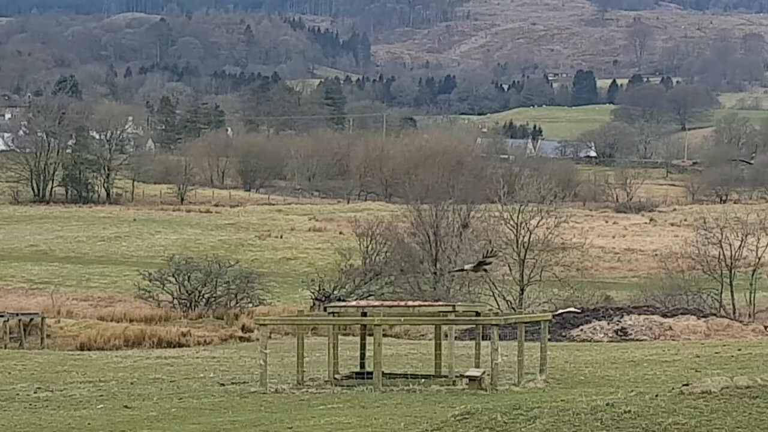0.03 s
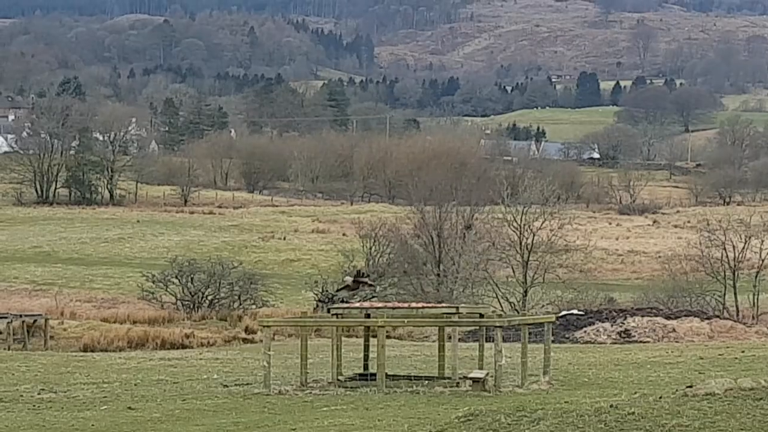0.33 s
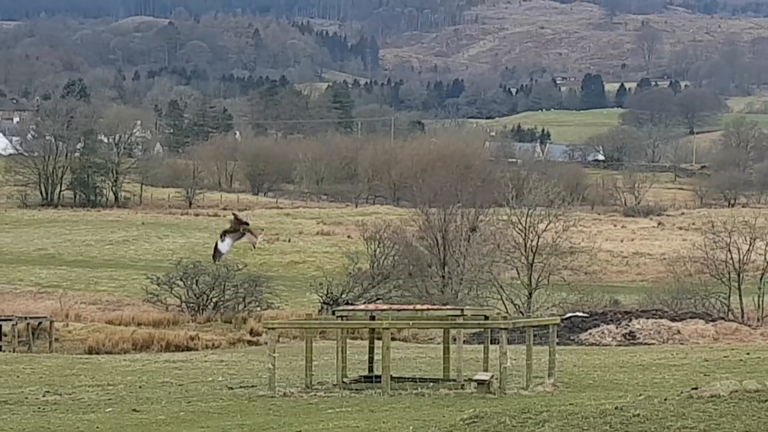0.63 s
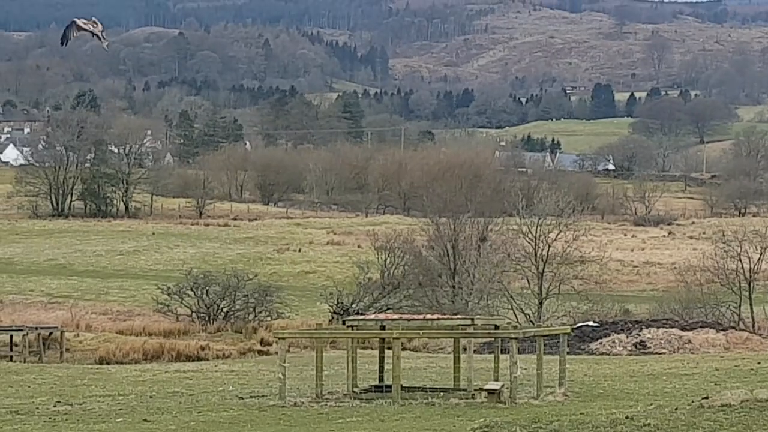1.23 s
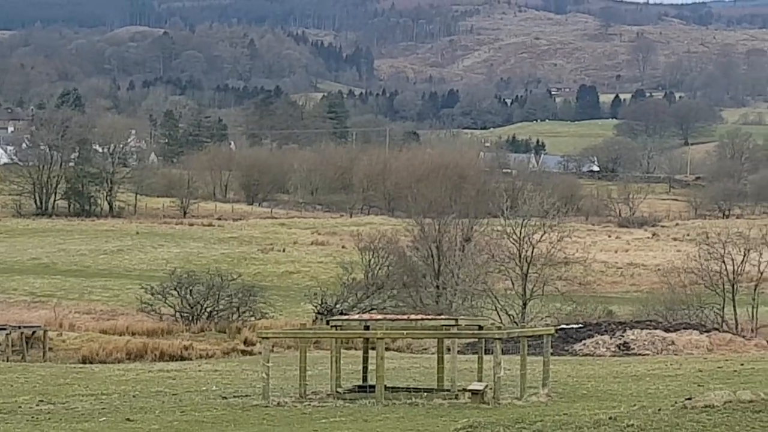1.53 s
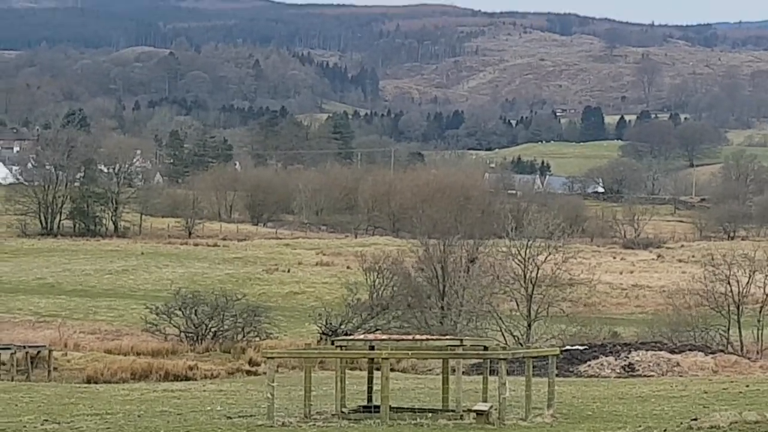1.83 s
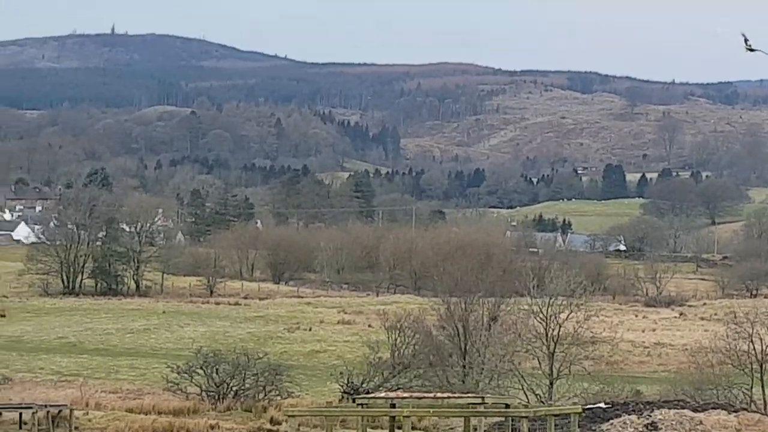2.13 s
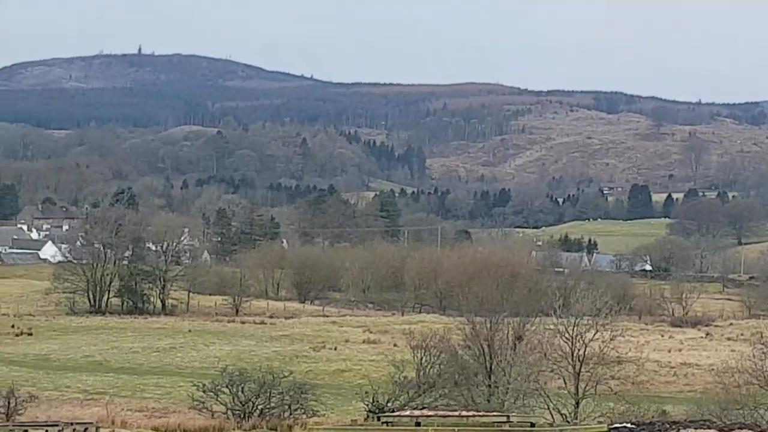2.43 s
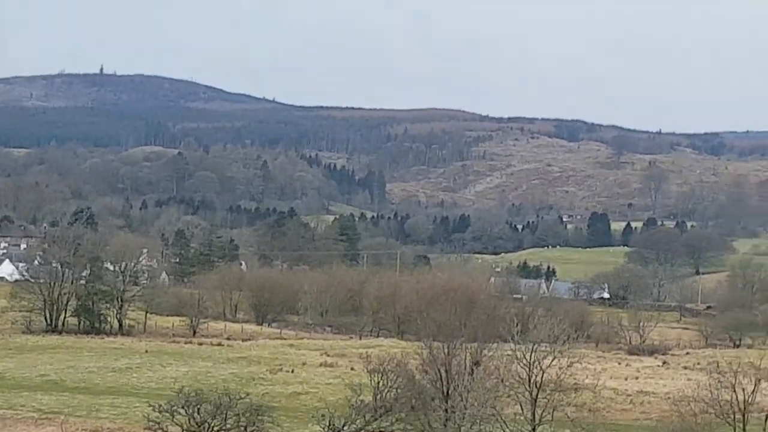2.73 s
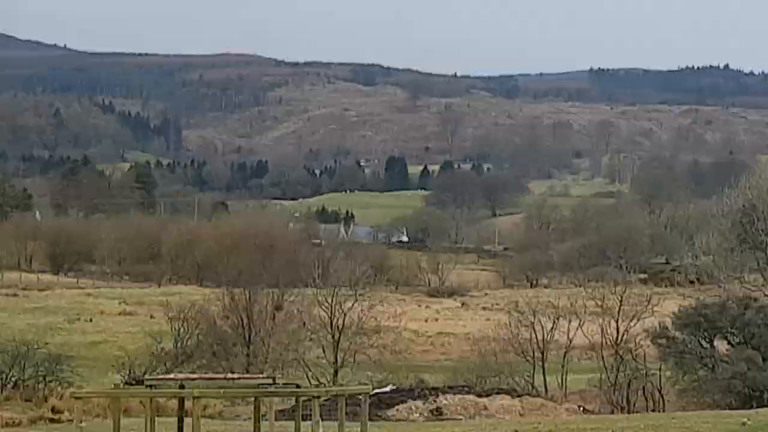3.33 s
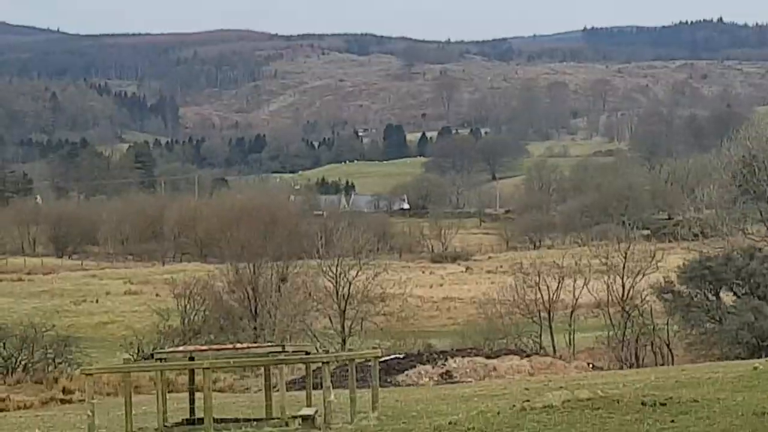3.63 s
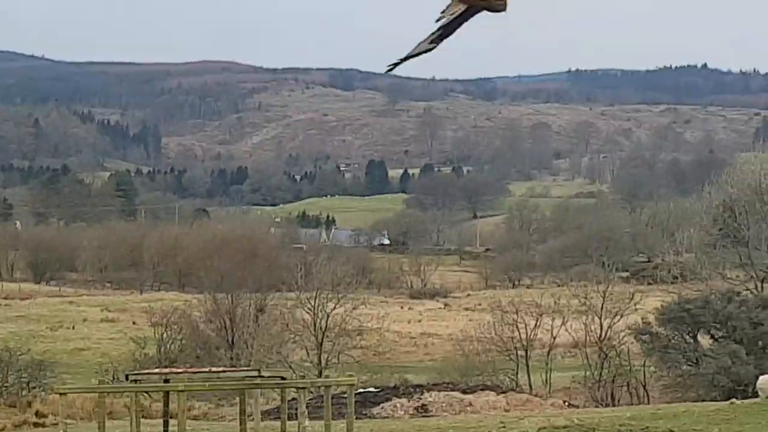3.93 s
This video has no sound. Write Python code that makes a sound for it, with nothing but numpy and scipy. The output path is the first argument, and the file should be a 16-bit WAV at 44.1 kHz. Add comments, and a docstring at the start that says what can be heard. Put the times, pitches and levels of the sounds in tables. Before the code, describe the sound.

Wind rumbles and thumps on the microphone, with thin, wavering bird whistles behind it.

```python
"""Gusts buffet the two microphone ports of a hand-held camera while red kites whistle over an open field.
Eddies strike each port as random low thumps; the kites sing thin, wavering tones, hoarser farther off.
The camera ticks three times, and there is one sharp crack as a gust overloads the right microphone.
As the camera swings round, a hand or sleeve brushes its left side with a grainy hiss.
Far off, an animal, probably a cow, gives one faint call."""
import sys
import numpy as np
from scipy import signal
from scipy.fft import rfft, irfft
from scipy.io import wavfile

SR = 44100
rng = np.random.default_rng(int(sys.argv[2]) if len(sys.argv) > 2 else 0)


def file_out(sig):
    """Save sig as 16-bit WAV at sys.argv[1]."""
    # one column per channel
    cols = np.atleast_2d(sig).T
    # limit, then scale
    lim = np.clip(cols, -1, 1)
    pcm = np.round(lim * 32767).astype(np.int16)
    wavfile.write(sys.argv[1], SR, pcm)


N = 176400
T = np.arange(N) / SR
HZ = np.fft.rfftfreq(N, 1 / SR)


def amp(db):
    """Decibels to gain."""
    return 10 ** (np.asarray(db) / 20)


def unit(x):
    """Scales to rms 1."""
    return x / np.sqrt(np.mean(x ** 2) + 1e-20)


def colour(x, points):
    """Equalises by a curve of (frequency [Hz], gain [dB]) points."""
    hz, db = np.transpose(points)
    return irfft(rfft(x) * amp(np.interp(np.log(HZ + 1), np.log(hz), db)), N)


def noise(points):
    """Noise of rms 1 with the given spectrum."""
    return unit(colour(rng.standard_normal(N), points))


def drift(hz):
    """Smooth random modulation of rms 1, moving at up to about hz."""
    return unit(irfft(rfft(rng.standard_normal(N)) * np.exp(-(HZ / hz) ** 2), N))


def phase_of(hz):
    """Running phase of a pitch curve."""
    return 2 * np.pi * np.cumsum(hz) / SR


def field_echo(x, t60_s=0.38):
    """Scatter from the ground and trees, different at each port."""
    t = T[:SR // 2]
    tails = [rng.standard_normal(len(t)) * amp(-60 * t / t60_s) for _ in range(2)]
    return np.array([signal.fftconvolve(x, tail / np.linalg.norm(tail))[:N] for tail in tails])


def field_air():
    """The open field: a soft, slightly wavering bed of noise."""
    # spectrum of the bed (frequency [Hz], level [dB])
    spectrum = [(100, 4), (400, 12.5), (750, 2), (1050, 2), (1400, -4), (2200, -2.5), (3200, -9.5),
                (5000, -12.5), (6200, -18.5), (7700, -16.5), (9000, -27), (10500, -26), (12300, -20.5),
                (15800, -24)]
    # bed level (left [dB], right [dB])
    sides_db = [-55, -50.5]
    return np.array([amp(db + 1.2 * drift(16)) * noise(spectrum) for db in sides_db])


def port_wind(curve, buffets):
    """Eddies strike one port in clumps of random pushes, with one hard blow in each buffet."""
    # eddy sound in a wind of ref_db (band centre [Hz], level [dB], growth [dB per dB of wind])
    eddy_bands = [(28.7, -38.5, 0.23), (64, -27, 0.53), (126, -20.5, 0.72), (266.5, -24, 1.05),
                  (496.5, -36.5, 1.72), (971, -63, 3), (1980, -79.5, 2)]
    ref_db, eddies_per_s, spread_db, clump_db = -20, 700, 5.5, 4
    buffet_s, blow_db, sharpest_db, port_hz = 0.016, 7, 24, 85
    level = np.interp(T, *np.transpose(curve))
    clumps = clump_db * drift(30) / np.hypot(1, amp(level - ref_db) ** 2)  # strong wind is steadier
    power = amp(level + clumps) ** 2
    strikes = rng.random(N) < eddies_per_s / SR
    size = amp(spread_db * rng.uniform(-1, 1, N))
    for s, db in buffets:
        power += amp(db) ** 2 * np.exp(-(2 * (T - s) / buffet_s) ** 2)
        strikes[round(s * SR)], size[round(s * SR)] = True, amp(blow_db)
    pushes = strikes * rng.choice([-1, 1], N)
    strength = size * np.sqrt(power) / amp(ref_db)
    sharpness = strength / np.hypot(1, strength / amp(sharpest_db))  # harder is brighter, up to a limit
    jw = 1j * HZ / port_hz
    low_cut = jw ** 2 / (1 + jw + jw ** 2)  # the port cuts the deepest bass
    centres = [row[0] for row in eddy_bands]
    knots = np.log([centres[0] / 2] + centres + [centres[-1] * 2])
    spectrum = 0
    for k, (_, db, growth) in enumerate(eddy_bands):
        band = low_cut * np.interp(np.log(HZ + 1), knots, np.arange(len(knots)) == k + 1)
        band /= np.sqrt(np.mean(abs(band) ** 2))
        train = pushes * strength * sharpness ** (growth - 1) / np.std(pushes * size ** growth)
        spectrum += amp(db) * band * rfft(train)
    return irfft(spectrum, N)


def gusts():
    """Wind rumbles and thumps on each port separately, harder on the right."""
    # wind strength at each port (time [s], level [dB])
    wind_left = [(0, -42), (.28, -46.5), (.5, -39.5), (.66, -24.5), (.88, -30), (1.1, -40), (1.2, -57),
                 (1.34, -25), (1.5, -34), (1.72, -37.5), (1.95, -28), (2.2, -28.5), (2.36, -32),
                 (2.72, -32.5), (2.88, -19), (3.0, -29.5), (3.12, -15.5), (3.3, -29.5), (3.5, -39.5),
                 (3.66, -33.5), (3.78, -48.5), (4, -46)]
    wind_right = [(0, -53.5), (.07, -56), (.3, -34), (.38, -43), (.48, -30), (.62, -33.5), (.92, -38),
                  (.98, -16), (1.15, -19.5), (1.24, -43.5), (1.57, -37.5), (1.63, -14), (1.9, -14),
                  (2.18, -15.5), (2.25, -24), (2.4, -38.5), (2.76, -47.5), (3.0, -30.5), (3.1, -22.5),
                  (3.48, -22.5), (3.56, -37.5), (3.65, -13.5), (3.8, -28.5), (4, -34.5)]
    # short buffets at each port (peak time [s], level [dB])
    buffets_left = [(.098, -31), (.513, -25.5), (0.643, -23), (0.677, -17), (0.691, -22.5), (0.734, -13),
                    (.852, -18.5), (.912, -26), (1.024, -20), (1.089, -19), (1.308, -22.5), (1.378, -23),
                    (1.552, -17.5), (1.633, -22.5), (1.978, -11.5), (2.086, -17.5), (2.164, -16),
                    (2.61, -15.5), (2.637, -22), (2.772, -19), (3.132, -20.5), (3.207, -14.5), (3.343, -21)]
    buffets_right = [(.135, -24), (.156, -19.5), (.439, -24.5), (.556, -17), (.677, -16.5), (.695, -20),
                     (.817, -12.5), (0.98, -16), (1.128, -28), (1.616, -12.5), (1.654, -19.5), (1.778, -17),
                     (1.84, -9), (1.883, -10), (1.926, -13), (1.962, -10.5), (2.013, -11), (2.048, -10),
                     (2.079, -15), (2.135, -14), (2.173, -13), (2.194, -10), (2.329, -21), (2.461, -20),
                     (3.106, -17), (3.195, -27.5), (3.481, -19.5), (3.634, -15.5)]
    return np.array([port_wind(wind_left, buffets_left), port_wind(wind_right, buffets_right)])


def kite_whistle(contour):
    """A thin, unsteady tone with two flickering overtones; the upper one drops out on high notes."""
    waver, waver_hz, flutter_db = .004, 130, 2.8
    third_db, third_top_hz = -15, 6900
    s, hz, fundamental_db, octave_db = np.transpose(contour)
    pitch = np.interp(T, s, hz) * (1 + waver * drift(waver_hz))
    phase = phase_of(pitch)
    gate = np.clip((T - s[0]) / 0.0076, 0, 1) * np.clip((s[-1] - T) / .01, 0, 1)
    fundamental = amp(np.interp(T, s, fundamental_db)) * np.sin(phase)
    third_gain = amp(third_db) / np.hypot(1, (3 * pitch / third_top_hz) ** 30)
    overtones = np.sin(2 * phase) + third_gain * np.sin(3 * phase)
    overtones *= amp(np.interp(T, s, octave_db) + 0.5 * drift(25))
    return np.sqrt(2) * gate * (fundamental + overtones) * amp(flutter_db * drift(waver_hz))


def far_kite(start, length, top_hz, db, hiss_db, roughness, bend):
    """A hoarse, broken whistle that arches up and down, with some hiss."""
    # rasp in the voice (frequency [Hz], level [dB])
    rasp = [(2000, -39.5), (3500, -3), (7300, -10), (9000, -24.5)]
    arch = np.sin(np.pi * np.clip((T - start) / length, 0, 1))
    pitch = top_hz * (1 - bend * (1 - arch) ** 2) * (1 + roughness * drift(500))
    envelope = amp(db + 3 * drift(60)) * arch ** 0.61
    return envelope * (np.sin(phase_of(pitch)) + amp(hiss_db) * noise(rasp))


def red_kites(echo_db=-15, pan_db=4.5):
    """A long whistle, a higher one and hoarse far notes echo over the field, off to the right."""
    # whistle contours (time [s], pitch [Hz], fundamental [dB], octave [dB])
    long_whistle = [(0, 2017, -73, -67), (.055, 2000, -69, -73), (.118, 2050, -61, -79.5),
                    (.234, 2055, -68.5, -74), (.3, 2040, -72, -82), (.48, 2150, -74.5, -78),
                    (.57, 2170, -76, -75), (.61, 2243, -76, -67.5), (.665, 2257, -67, -66.5),
                    (.74, 2216, -76.5, -72.5), (.815, 2280, -63, -69), (.85, 2250, -68, -65),
                    (.89, 2200, -80.5, -68.5), (.988, 2360, -61, -68.5), (1.04, 2370, -57.5, -73.5),
                    (1.065, 2354, -59.5, -64), (1.11, 2140, -66, -79)]
    high_whistle = [(1.452, 2310, -75, -90), (1.47, 2500, -50.5, -83), (1.479, 2956, -49, -72),
                    (1.494, 2970, -44.5, -73), (1.522, 2890, -48.5, -75.5), (1.556, 2840, -46.5, -73),
                    (1.588, 2778, -47, -73), (1.618, 2560, -66, -85.5), (1.636, 2400, -51.5, -66),
                    (1.66, 2274, -57, -77), (1.71, 2235, -56.5, -91.5), (1.765, 2180, -77, -83.5),
                    (1.8, 2185, -80, -89), (1.83, 2260, -56.5, -77), (1.875, 2380, -57, -82.5),
                    (1.925, 2220, -71, -87.5)]
    # kites farther off (start [s], length [s], top pitch [Hz], level [dB], hiss share [dB],
    # pitch roughness [0-1], pitch bend [0-1])
    far_notes = [(0.83, .07, 5050, -73, -3, .025, .05), (1.128, 0.15, 3830, -61, -8, .06, .04),
                 (2.17, 0.14, 2880, -60.5, -18, .04, .25), (2.455, 0.12, 2830, -63.5, -16, .045, .25)]
    calls = kite_whistle(long_whistle) * amp(2.2 * drift(30))  # the long call flickers more
    calls += kite_whistle(high_whistle)
    calls += sum(far_kite(*note) for note in far_notes)
    return (calls + amp(echo_db) * field_echo(calls)) * amp([[-pan_db], [pan_db]])


def ticks_and_crack():
    """Three camera ticks and an overload crack on the right: snaps with a gritty tail and a short ring."""
    # snaps (time [s], level [dB], treble roll-off [Hz], ring share [dB])
    # the second row is the crack of a gust overloading the right microphone
    snaps = [(1.7014, -29.5, 3600, -6.5), (1.8832, -18, 7000, -22), (2.0954, -11.5, 20000, -28),
             (2.3855, -20, 4500, -28)]
    # tone of a snap (frequency [Hz], gain [dB])
    snap_eq = [(500, -13), (2500, 8), (4200, 2.5), (6000, -11), (7500, -2), (9700, -21.5), (12000, -12.5),
               (15000, -6)]
    ring_hz, ring_s, tail_s, tail_db, left_db = 3170, 0.0023, 0.012, -28.5, -22
    out = np.zeros(N)
    for s, db, top_hz, ring_db in snaps:
        age, gain = np.maximum(T - s, 0), amp(db) * (T >= s)
        snap = gain * amp(tail_db) * np.exp(-age / tail_s) * rng.standard_normal(N)
        snap[round(s * SR)] = amp(db)  # the transient
        out += irfft(rfft(colour(snap, snap_eq)) / np.hypot(1, (HZ / top_hz) ** 2), N)
        out += gain * amp(ring_db) * np.exp(-age / ring_s) * np.sin(2 * np.pi * ring_hz * age)
    return out * amp([[left_db], [0]])


def brushes(grain_db=1.5, right_db=-27):
    """Cloth or skin sweeps past the left port: a grainy hiss with a lower scrape."""
    # strokes (peak time [s], rise [s], fall [s], level [dB], scrape share [dB])
    strokes = [(2.79, 0.071, 0.039, -48, -28), (3.005, 0.033, 0.038, -43.5, -24),
               (3.158, 0.021, 0.019, -23, -3), (3.535, 0.052, 0.042, -37.5, -34),
               (3.639, 0.016, 0.026, -31.5, 8.5)]
    # spectra of the hiss and the scrape (frequency [Hz], level [dB])
    hiss_eq = [(800, -15), (3000, 0), (5000, -2.5), (7700, 1.5), (9300, -2), (10700, 1.5), (12000, 7),
               (13500, -3), (15800, -1.5)]
    scrape_eq = [(150, -11), (400, -4), (800, 2.5), (1500, -1.5), (3000, -6), (5000, -12), (9000, -20),
                 (16000, -40)]
    hiss_gain, scrape_gain = np.zeros(N), np.zeros(N)
    for s, rise, fall, db, scrape_db in strokes:
        stroke = amp(db) * np.exp(-abs((T - s) / np.where(T < s, rise, fall)) ** 1.08)
        stroke *= np.clip((s + 2.64 * fall - T) / .008, 0, 1)  # lift-off cuts the tail
        hiss_gain += stroke
        scrape_gain += stroke * amp(scrape_db)
    grain = unit(amp(grain_db * drift(500)))
    friction = np.array([hiss_gain * noise(hiss_eq) + scrape_gain * noise(scrape_eq) for _ in range(2)])
    return grain * friction * amp([[0], [right_db]])


def rubbing():
    """A steady friction hiss at both ports while the camera turns."""
    # rub envelope (time [s], level [dB])
    envelope = [(2.745, -46.5), (2.92, -45), (3.06, -45), (3.24, -49), (3.36, -46), (3.47, -47),
                (3.6, -39.5), (3.69, -41.5), (3.78, -45), (3.88, -44.5), (4, -46)]
    # rub spectrum at each port (frequency [Hz], level [dB])
    left_eq = [(200, 6), (600, 2), (1300, -3.5), (2500, -6.5), (4200, -16), (7500, -15), (9500, -18),
               (12200, -13.5), (13500, -17), (15800, -26)]
    right_eq = [(200, 0.5), (600, -2), (1300, -4), (2500, -8), (4200, -14.5), (6000, -16), (7700, -14),
                (9200, -30), (12200, -26), (15800, -23)]
    # balance (left [dB], right [dB])
    sides_db = [-2, 0.5]
    hiss = np.array([noise(left_eq), noise(right_eq)]) * amp(sides_db)[:, None]
    return hiss * amp(np.interp(T, *np.transpose(envelope)) + 0.55 * drift(120))


def handling(start_s=2.735):
    """A hand or sleeve meets the camera, bringing in the brushes and the rub together."""
    contact = np.clip((T - start_s) / 0.0062, 0, 1)
    return contact * (brushes() + rubbing())


def distant_lowing(echo_db=-9, left_db=-3):
    """A far call, probably a cow: three harmonics on one rising glide, echoing over the field."""
    # lowing (start [s], length [s], first, middle and last pitch [Hz], harmonics 1, 2 and 3 [dB])
    calls = [(3.45, .19, 358, 378, 392, -40, -62, -68)]
    voice = np.zeros(N)
    for start, length, first_hz, middle_hz, last_hz, *harmonics_db in calls:
        progress = np.clip((T - start) / length, 0, 1)
        glide = np.polyval(np.polyfit([0, .5, 1], [first_hz, middle_hz, last_hz], 2), progress)
        phase = phase_of(glide * (1 + 0.0018 * drift(50)))
        tone = sum(amp(db) * np.sin(k * phase) for k, db in enumerate(harmonics_db, 1))
        voice += np.sqrt(2) * np.sin(np.pi * progress) * tone
    return (voice + amp(echo_db) * field_echo(voice)) * amp([[left_db], [0]])


def scene():
    """Birds, far cattle and field air, with wind and handling right on the microphone."""
    field = red_kites() + distant_lowing() + field_air()
    return field + gusts() + ticks_and_crack() + handling()


def record(dry, top_hz=15850):
    """Soft clipping rounds off the strongest buffets; a steep low-pass trims the highest treble."""
    clipped = dry / (1 + dry ** 6) ** (1 / 6)
    fades = np.clip(np.minimum(T, T[-1] - T) / .003, 0, 1)
    low_pass = signal.firwin(511, top_hz, window=("kaiser", 9), fs=SR)
    return signal.oaconvolve(clipped * fades, low_pass[None], "same")


dry = scene()
out = record(dry)
file_out(out)
```